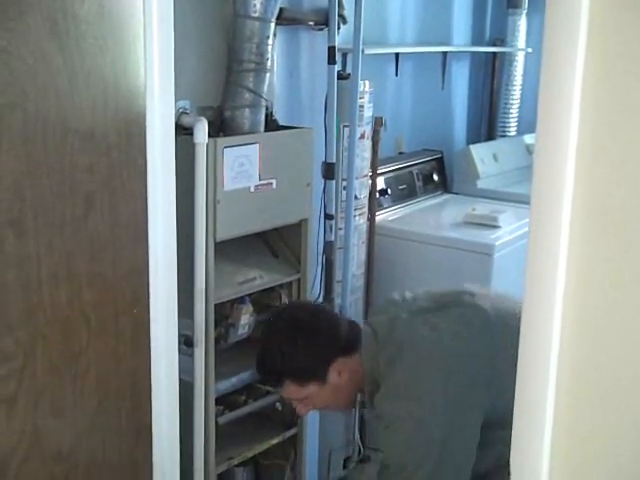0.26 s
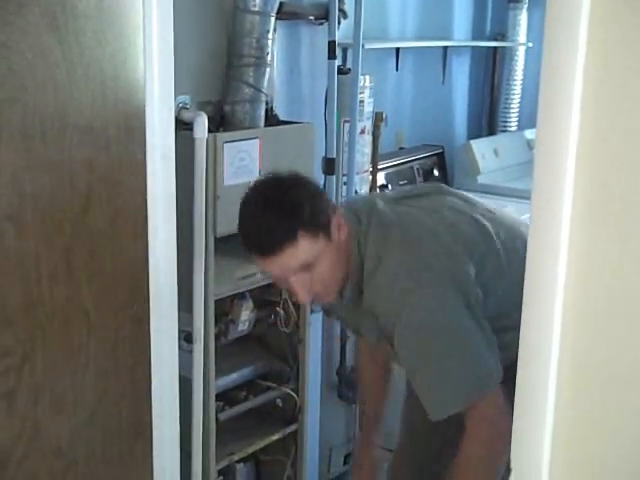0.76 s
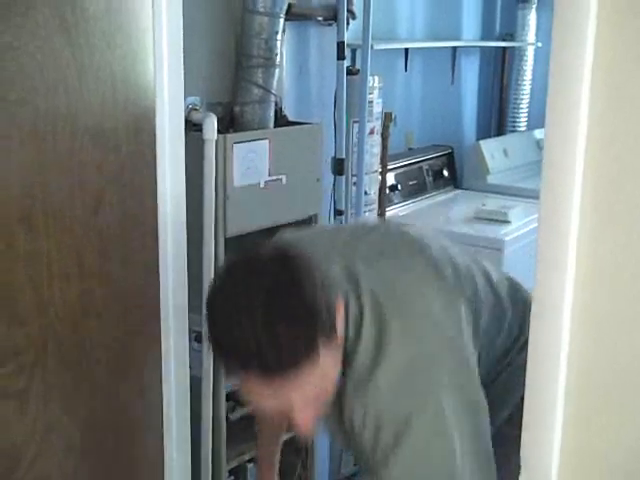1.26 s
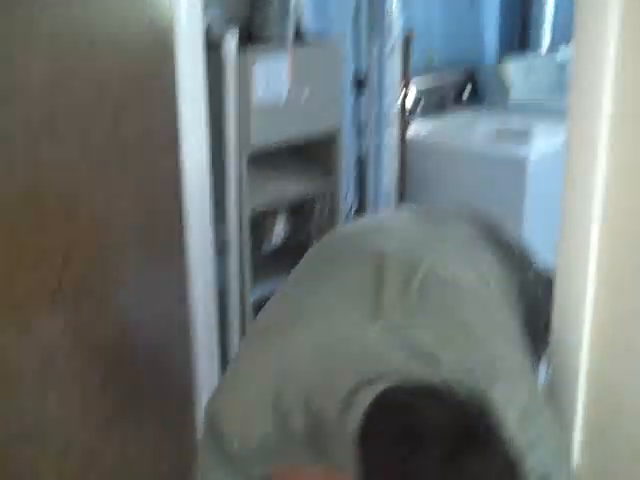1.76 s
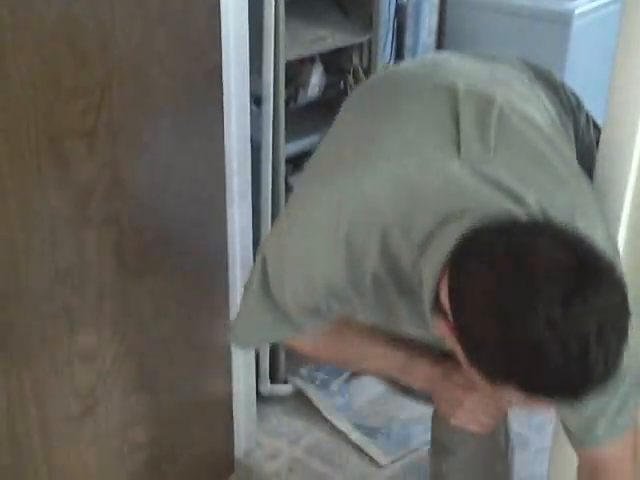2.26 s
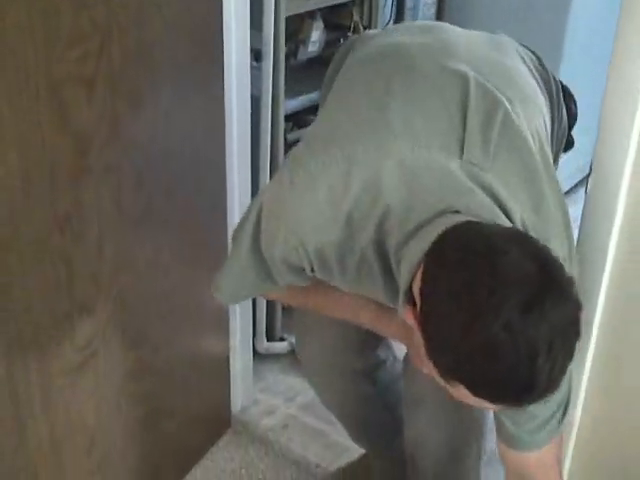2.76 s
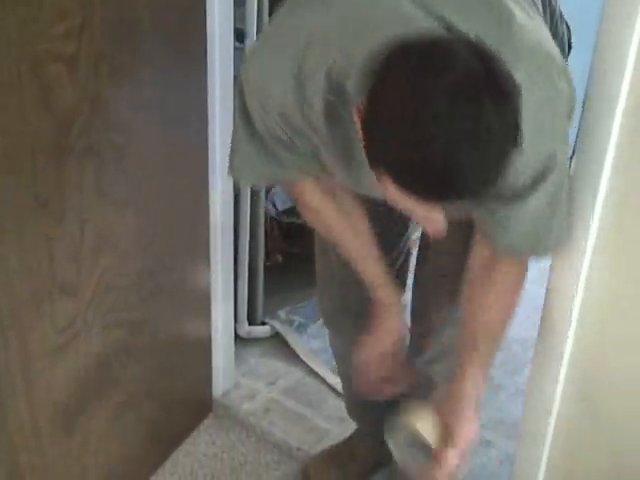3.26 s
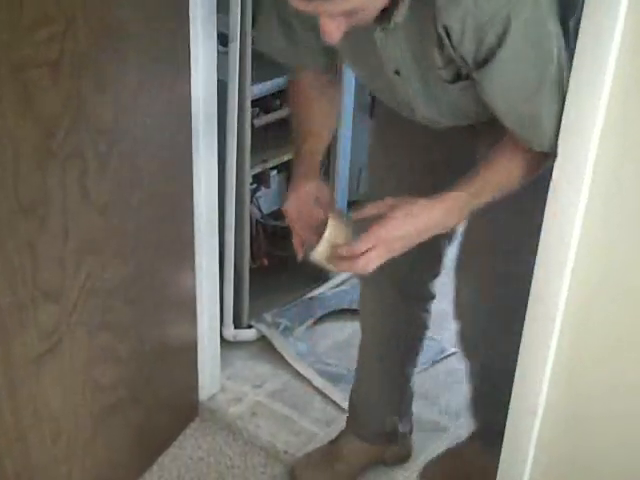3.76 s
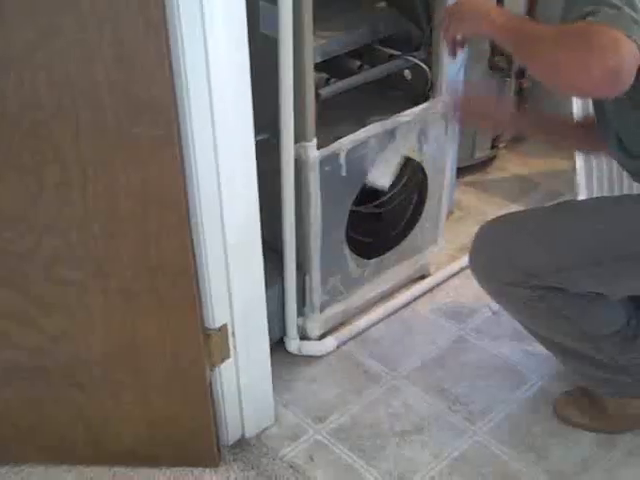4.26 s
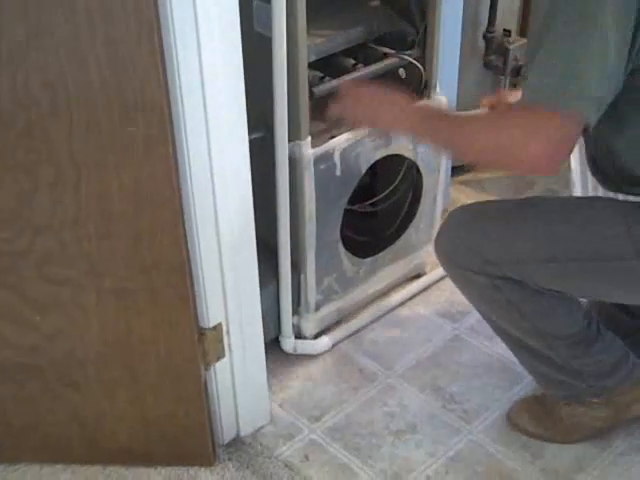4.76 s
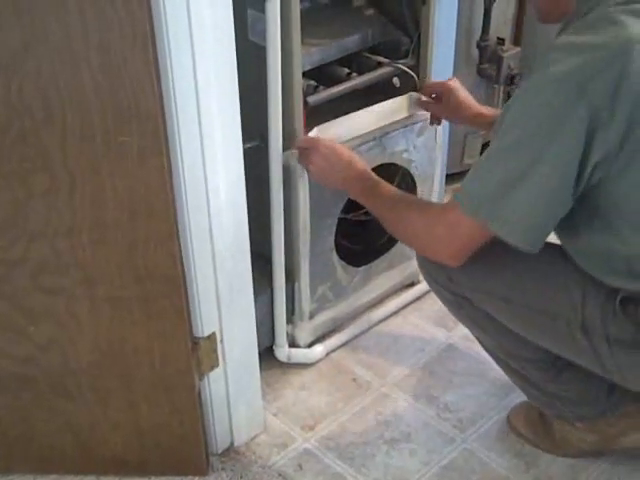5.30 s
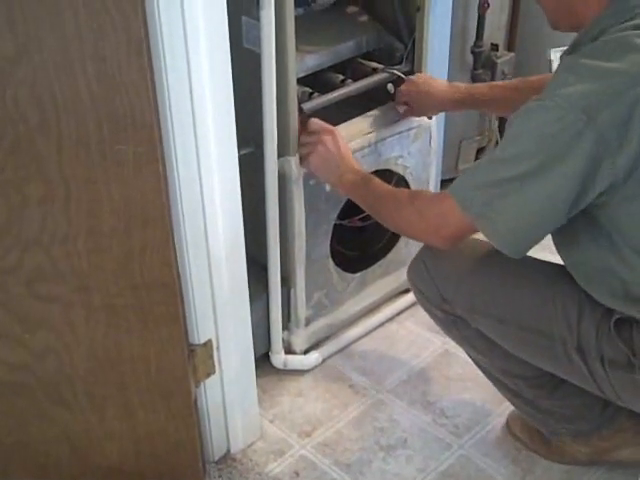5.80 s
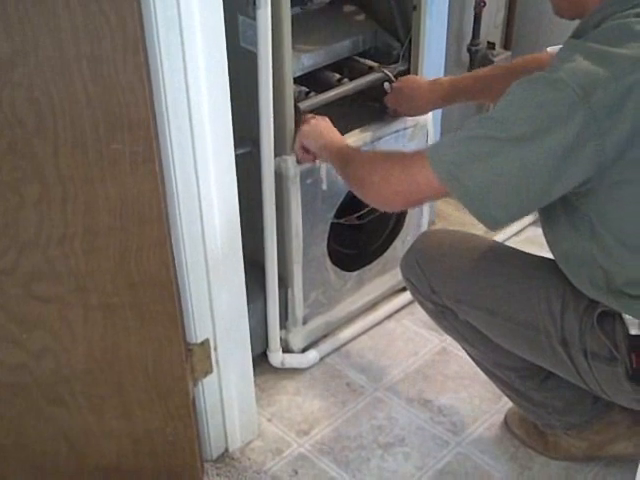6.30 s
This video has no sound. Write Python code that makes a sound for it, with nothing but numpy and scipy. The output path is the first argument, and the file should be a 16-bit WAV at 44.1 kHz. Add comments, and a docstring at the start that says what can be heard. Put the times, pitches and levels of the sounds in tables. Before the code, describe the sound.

A panel clatters down, then clothes rustle and tape peels and crinkles against plastic sheeting over a faint hiss in a small room.

```python
"""A small, hard-walled closet, where a man seals a furnace cabinet over a steady hiss of air. Shoes and hands
bump, a stiff panel clatters down and rings, and small hard things clack and clink. Clothes and plastic
sheeting rustle as he bends for the tape; a strip peels off in tiny slips of glue and is pressed on with
sharp crinkles. Jumps in the signal's offset make low pops, and the sound drops out once, briefly."""
import sys
import numpy as np
from scipy import signal
from scipy.fft import rfft, irfft
from scipy.io import wavfile

SR = 44100
rng = np.random.default_rng(int(sys.argv[2]) if len(sys.argv) > 2 else 0)


def wrap_up_sound(samples):
    """Save the sound to the file named by the first command line argument, as 16-bit audio."""
    columns = np.atleast_2d(samples).T
    # keep every value between -1 and 1, then stretch to whole-number steps
    tamed = np.clip(columns, -1, 1)
    steps = np.round(tamed * 32767).astype(np.int16)
    wavfile.write(sys.argv[1], SR, steps)


N = 288414
TIME = np.arange(N) / SR
CUTOFF_HZ = 15620
DIP_S, MUTE_S, RETURN_S = 4.326, 4.385, 4.4245   # the dropout


def from_db(db):
    """Decibels to gain."""
    return 10 ** (np.asarray(db) / 20)


def rms_one(x):
    """Scale to rms 1."""
    return x / np.sqrt(np.mean(x ** 2) + 1e-20)


def at_hz(points, hz):
    """Read a curve on a log-frequency axis."""
    f, value = np.transpose(points)
    return np.interp(np.log(hz + 1), np.log(f), value)


def add(out, s, sound):
    """Mix a sound in at s seconds."""
    i = max(0, round(s * SR))
    out[i:i + len(sound)] += sound[:N - i]


def colour(x, spectrum, tilt_db=0, peaks_hz=(), peak_db=7.0, peak_octaves=0.096, size=4096):
    """Minimum-phase EQ of unit energy: a spectrum, tilted per octave, with resonances on top."""
    hz = np.arange(size // 2 + 1) * SR / size
    shape_db = at_hz(spectrum, hz) + tilt_db * np.log2(np.clip(hz, 700, CUTOFF_HZ))
    shape_db += sum(peak_db / (1 + (np.log2((hz + 1) / f) / peak_octaves) ** 2) for f in peaks_hz)
    cepstrum = irfft(np.log(from_db(shape_db)))
    cepstrum[1:size // 2] *= 2   # folded forward, so nothing rings ahead of an attack
    cepstrum[size // 2 + 1:] = 0
    response = irfft(np.exp(rfft(cepstrum)))
    return signal.fftconvolve(x, response / np.linalg.norm(response))[:len(x)]


def air():
    """Room tone: a steady hiss, heaviest in the lows."""
    # noise colour: f/Hz, level/dB
    spectrum = [(15, -30.5), (25, 5), (140, -5), (227, -4), (523, -7), (722, -8), (895, -7.5), (1020, -8.5),
                (1530, -8.5), (1660, -12), (2300, -15), (3530, -16.5), (4260, -15.5), (5010, -22),
                (15500, -23.5)]
    return from_db(-67.5) * colour(rng.standard_normal(N), spectrum)


def contacts(hits, spectrum, crack, rise_s, size=8192):
    """Each hit is a crack in a fast-dying noise burst; returns these and compact blows for the reverb."""
    direct, blows, t = np.zeros(N), np.zeros(N), TIME[:size]
    click = signal.unit_impulse(size, round(SR / 1000))
    for s, db, tilt_db, fade_s, *own_hz in hits:
        envelope = np.exp(-t / fade_s) * (1 - np.exp(-t / rise_s))
        strength = from_db(db) * np.sqrt(np.mean(envelope ** 2))
        burst = rng.standard_normal(size) * envelope + crack * click
        add(direct, s, strength * rms_one(colour(burst, spectrum, tilt_db, own_hz)))
        blow = rms_one(colour(click, spectrum, tilt_db, own_hz))
        add(blows, s, strength * blow * rng.choice([-1, 1]))
    return direct, blows


def closet(x, wet_db, early_db, early_s, bands=12):
    """The walls return a cluster of near echoes and a diffuse tail that dies sooner in the treble."""
    # reverb decay: f/Hz, t60/s
    decay = [(150, 1), (500, 1), (1000, 0.53), (2000, 0.53), (4500, 0.43), (8000, 0.53), (15000, 0.1)]
    t, tail = TIME[:SR], 0
    edges = np.geomspace(60, 18000, bands + 1)
    for low, high in zip(edges, edges[1:]):
        bandpass = signal.butter(2, [low, high], "band", fs=SR, output="sos")
        band = signal.sosfilt(bandpass, rng.standard_normal(SR))
        tail = tail + band * from_db(-60 * t / at_hz(decay, np.sqrt(low * high)))
    early = rng.standard_normal(SR) * (rng.random(SR) < .05) * np.exp(-t / early_s)
    build_up = 1 - np.exp(-(t / 0.0019) ** 2)
    echoes = from_db(wet_db) * rms_one(tail * build_up) + from_db(early_db) * rms_one(early * build_up)
    return signal.fftconvolve(x, echoes / np.sqrt(SR))[:N]


def bumps():
    """Shoes and hands land dully on the vinyl floor and the cabinet."""
    # soft hits: t/s, level/dB, tilt/(dB/octave), fade/s
    hits = [(0.023, -52, -3, 0.0089), (0.037, -53.5, 4, 0.0093), (1.19, -61.5, -1, 0.035),
            (2.958, -46.5, 12, 0.0066), (3.9095, -39.5, 6, 0.0016), (6.211, -47.5, 6, 0.016)]
    # dull body of a bump: f/Hz, level/dB
    spectrum = [(80, -16.5), (200, -16), (400, -7), (650, 0), (950, -8.5), (1500, -17), (4000, -38.5),
                (15000, -68)]
    direct, blows = contacts(hits, spectrum, crack=0.96, rise_s=0.00071)
    return from_db(1.0) * (direct + closet(blows, wet_db=-2.0, early_db=-3.0, early_s=0.028))


def effort(gestures, rest_db, rest_brightness_db, roundness=0.54):
    """Level and brightness of sliding: each gesture swells to a rounded crest and sinks back to rest."""
    power = np.full(N, from_db(rest_db) ** 2)
    brightness = power * rest_brightness_db
    for s, db, brightness_db, swell_s, release_s in gestures:
        distance = np.maximum((s - TIME) / swell_s, (TIME - s) / release_s)
        fall = np.hypot(distance, roundness) - roundness
        share = (from_db(db) * np.exp(-np.minimum(fall, 20))) ** 2
        share *= (TIME > MUTE_S) == (s > MUTE_S)   # no gesture carries across the dropout
        power += share
        brightness += share * brightness_db
    return 10 * np.log10(power), brightness / power


def grains(per_s, spread_db):
    """Random tiny clicks of uneven size, rms about 1."""
    sizes_db = spread_db * np.minimum(rng.exponential(1, N), 4)
    clicks = rms_one(from_db(sizes_db) * rng.choice([-1, 1], N))
    chance = per_s / SR
    return clicks * (rng.random(N) < chance) / np.sqrt(chance)


def drift(per_s):
    """A gliding random wobble of spread about 1."""
    steps = rng.standard_normal(2000)
    return np.interp(TIME * per_s, np.arange(len(steps)), steps)


def friction(level_db, brightness_db, spectrum, per_s, spread_db, patchy_db, folds=9):
    """Many little slips ride a level curve; brightness see-saws between body and treble."""
    slips = colour(grains(per_s, spread_db), spectrum)
    # folds form and flatten, each with a resonance that comes and goes
    for hz in np.geomspace(1400, 9000, folds):
        fold = signal.lfilter(*signal.iirpeak(hz, Q=7, fs=SR), slips)
        slips = slips + fold * (from_db(patchy_db * drift(per_s=30)) - 1)
    body = signal.sosfilt(signal.butter(1, 3500, fs=SR, output="sos"), slips)
    treble = slips - body
    return from_db(level_db) * (body * from_db(-brightness_db) + treble * from_db(brightness_db))


def faint_creases(level_db, count, above_db=6, spread_db=5, tilt_db=7.5, hz=3420, spread_octaves=0.33):
    """Cues for small creases that give way at random, denser and louder the harder the plastic moves."""
    odds = np.cumsum(from_db(0.3 * level_db))
    moments = np.searchsorted(odds, odds[-1] * (np.arange(count) + rng.random(count)) / count)
    return [(i / SR, level_db[i] + above_db + spread_db * size, tilt_db, hz * 2 ** (spread_octaves * pitch))
            for i, (size, pitch) in zip(moments, rng.standard_normal((count, 2)))]


def creases(cues, fade_s=0.0031):
    """Each crease snaps through with a short crack at its own resonance."""
    # colour of a snap: f/Hz, level/dB
    spectrum = [(100, -26.5), (300, -13.5), (700, -9.5), (1100, -4.5), (2000, -0.5), (3300, 1), (5000, -1),
                (7000, -3), (11000, -8.5), (15500, -14)]
    hits = [(s, db, tilt_db, fade_s, hz) for s, db, tilt_db, hz in cues]
    return np.array(contacts(hits, spectrum, crack=0.5, rise_s=0.0015))


def rustle():
    """Clothes and sheeting slide, never quite still, with a few small creases and clinks among them."""
    # body movements: crest t/s, level/dB, brightness/dB, swell/s, release/s
    moves = [(0.15, -67.5, -4.5, 0.4, 0.3), (0.285, -57.5, -2.5, 0.007, 0.046),
             (0.72, -56.5, -2.5, 0.13, 0.13), (1.23, -68, -4.5, 0.13, 0.12),
             (1.645, -45.5, 1, 0.021, 0.028), (1.75, -58.5, -0.5, 0.037, 0.12),
             (1.885, -51.5, 0.5, 0.016, 0.12), (2.095, -43.5, 0.5, 0.024, 0.075),
             (2.34, -57, -1.5, 0.02, 0.11), (2.67, -51.5, 0, 0.038, 0.02), (2.79, -52.5, -1.5, 0.052, 0.16),
             (3.005, -46, 2, 0.042, 0.04), (3.2, -50, 2.5, 0.045, 0.02), (3.33, -64.5, 0.5, 0.027, 0.055),
             (3.705, -60.5, -1.5, 0.045, 0.05), (3.8, -62.5, 1, 0.01, 0.015),
             (4.085, -60.5, 1, 0.016, 0.08), (4.26, -52.5, 0.5, 0.01, 0.3)]
    # colour of sliding cloth: f/Hz, level/dB
    spectrum = [(100, -8.5), (300, -10), (700, -2), (1400, 0.5), (3000, 1.5), (5000, -1.5), (8000, -3),
                (12000, -4), (15500, -7)]
    level_db, brightness_db = effort(moves, rest_db=-73.5, rest_brightness_db=0.5)
    slide = friction(level_db, brightness_db, spectrum, per_s=5000, spread_db=2.0, patchy_db=2.5)
    snaps, _ = creases(faint_creases(level_db, count=24))
    sound = from_db(-0.7) * slide + from_db(2.5) * snaps + clinks()
    return sound + closet(sound, wet_db=-15.5, early_db=-15.0, early_s=0.023)


def ringing(hits, modes, spread_db=4.9):
    """Every hit sets the same modes ringing in a new balance."""
    out, t = np.zeros(N), TIME[:SR]
    hz, mode_db, t60 = np.transpose(modes)
    rings = np.sin(2 * np.pi * hz[:, None] * t) * from_db(-60 * t / t60[:, None])
    for s, db, *_ in hits:
        strengths = from_db(db + mode_db + rng.normal(0, spread_db, len(hz)))
        add(out, s, (strengths * rng.choice([-1, 1], len(hz))) @ rings)
    return out


def clacks():
    """Small hard things are picked up and set down: light attacks with a faint ring."""
    # hard hits: t/s, level/dB, tilt/(dB/octave), fade/s
    hits = [(0.2665, -48.5, -13, 0.0056), (2.420, -40, -8, 0.0048), (2.4339, -21.5, 0, 0.0029),
            (2.445, -32.5, 2.5, .005), (2.452, -33, -4, 0.0033), (2.466, -38, 2.5, 0.01),
            (2.49, -40.5, 0.5, 0.017), (3.215, -40, -7.5, 0.0023), (3.909, -42, -1.5, 0.0026),
            (4.543, -48.5, -11, 0.0041), (6.234, -45, -10, 0.006)]
    # colour of the attack: f/Hz, level/dB
    spectrum = [(50, -47), (100, -31), (300, -15), (700, -9), (1100, -0.5), (1450, 4.5), (2200, -4.5),
                (3400, -2.5), (4300, -5.5), (5000, -4.5), (6200, -14.5), (10000, -21), (15500, -26)]
    # ring of the objects: f/Hz, level/dB, t60/s
    modes = [(913, -6.5, 0.41), (1225, 2, 0.19), (1450, -8, 0.27), (1570, 4, 0.26), (3600, -16, 0.18),
             (4900, -8, 0.26), (5080, -35, 0.29)]
    direct, blows = contacts(hits, spectrum, crack=4.9, rise_s=0.00059)
    direct += from_db(-27.5) * ringing(hits, modes)
    return from_db(-3.5) * (direct + closet(blows, wet_db=-2.0, early_db=-5.5, early_s=0.014))


def tape():
    """The glue lets go in countless small slips; creases snap as tape and sheeting are handled."""
    # pulls and rubs: crest t/s, level/dB, brightness/dB, swell/s, release/s
    pulls = [(4.75, -41, 3, 0.048, 0.06), (4.9, -52.5, 0, 0.022, 0.057), (5.045, -57, 3, 0.031, 0.025),
             (5.19, -53.5, 4, 0.022, 0.026), (5.515, -62, -1, 0.01, 0.05), (5.62, -61.5, 5, 0.02, 0.025),
             (5.71, -51.5, 2, 0.02, 0.019), (5.88, -62.5, -2, 0.05, 0.16), (6.1, -50.5, -4, 0.011, 0.08),
             (6.35, -56, -6, 0.015, 0.13), (6.535, -53, 0, 0.025, 0.037)]
    # colour of the peel: f/Hz, level/dB
    spectrum = [(180, -59), (300, -38), (417, -16), (526, -7), (590, -12.5), (685, -7.5), (1200, -4.5),
                (2000, -4), (2830, -4), (5000, -4.5), (9000, -11), (12300, -12.5), (15500, -16)]
    # foreground creases: t/s, level/dB, tilt/(dB/octave), resonance f/Hz
    crinkles = [(0.2671, -40, -5, 1200), (1.5746, -44, -5, 2310), (1.6011, -35.5, -3, 6300),
                (1.6241, -40, -3, 2880), (1.6892, -37.5, -1, 2440), (1.8724, -37.5, 0.5, 3340),
                (1.9484, -36, -0.5, 4070), (2.124, -32.5, -4.5, 2320), (2.1482, -28, 4, 6100),
                (2.1836, -20.5, 0.5, 3040), (2.206, -30.5, -1.5, 4520), (4.2383, -33.5, -2.5, 4060),
                (4.5887, -40, 3, 3310), (4.6054, -45, -7.5, 3480), (4.6613, -29, -3, 2050),
                (4.7484, -29.5, -0.5, 2966), (4.884, -28, 1.5, 4840), (5.0468, -37.5, 8, 5130),
                (5.147, -44.5, 6, 10900), (5.1777, -31, 2, 5200), (5.3592, -49, 8, 3450),
                (5.4953, -43, 0, 3300), (5.7342, -31, -1.5, 3320), (5.7853, -39, -2, 3190),
                (5.7992, -35.5, -1, 2590), (5.8506, -35.5, -1, 5670), (5.895, -41, 7, 3800),
                (6.0584, -33.5, 0, 3240), (6.0674, -30.5, -1.5, 5100), (6.0902, -25, -2, 2820),
                (6.1044, -28, -2.5, 3700), (6.2039, -37, -5, 3290), (6.213, -28.5, -1, 1900),
                (6.232, -28, -1, 2790), (6.3306, -28.5, 3.5, 4700), (6.3377, -31.5, -3.5, 4200),
                (6.3819, -26.5, 2, 3310), (6.5184, -36, 3, 2870)]
    level_db, brightness_db = effort(pulls, rest_db=-79.5, rest_brightness_db=-8.5)
    peel = friction(level_db, brightness_db, spectrum, per_s=3500, spread_db=2.5, patchy_db=4.5)
    peel *= from_db(-2.0)
    snaps, blows = from_db(-1.0) * creases(crinkles + faint_creases(level_db, count=36))
    send = from_db(-6.5) * peel + blows
    return peel + snaps + closet(send, wet_db=-8.0, early_db=-4.5, early_s=0.018)


def panel():
    """A stiff panel lands on one edge, then slaps down, bounces and rings."""
    # knocks on floor and cabinet: t/s, level/dB, tilt/(dB/octave), fade/s
    hits = [(0.7048, -25.5, 5, 0.0048), (0.710, -28, -12, 0.0038), (0.717, -36, -3, 0.0037),
            (0.7265, -28, -2.5, 0.0065), (0.731, -21, 0, 0.0085), (0.7385, -25.5, 5, 0.005),
            (0.746, -40, -0.5, 0.014), (0.753, -29.5, 0.5, 0.0055), (0.761, -24.5, -1, 0.01),
            (0.768, -23, -6, 0.0046), (0.927, -38, 2, 0.0066)]
    # colour of the slap: f/Hz, level/dB
    spectrum = [(50, -71), (100, -52.5), (135, -26.5), (200, -21), (330, -14.5), (500, -12), (750, -7.5),
                (1050, 3), (1600, -1), (2200, -5.5), (3000, -11), (4000, -20.5), (4900, -20.5), (6000, -29),
                (10000, -36.5), (15500, -48)]
    # ring of the panel: f/Hz, level/dB, t60/s
    modes = [(328, -22, .5), (510, -24.5, 1), (863, -15, 0.45), (1057, -1.5, 0.4), (1140, -34, .3),
             (1274, -1, 0.22), (1240, -9, 0.32), (1494, -5, 0.22), (1637, 4, 0.14), (1544, -16, 0.14),
             (1860, 0, 0.29), (1820, -23, 0.32), (2140, -21, 0.26)]
    direct, blows = contacts(hits, spectrum, crack=2.2, rise_s=0.00052)
    direct += from_db(-21.0) * ringing(hits, modes)
    return from_db(-0.5) * (direct + closet(blows, wet_db=-6.0, early_db=-4.0, early_s=0.032))


def clinks():
    """Small metal things touch and ring in high, pure modes."""
    # pings: t/s, level/dB, f/Hz, t60/s
    pings = [(1.6, -50, 6370, 0.065), (1.6, -46.5, 12100, 0.11), (2.031, -41.5, 6358, 0.083),
             (2.03, -46, 4330, 0.046), (2.03, -44, 13500, 0.04), (2.152, -43, 14400, .16),
             (2.152, -36, 14520, .09), (2.151, -47, 10750, 0.1), (2.151, -48, 6020, .14),
             (2.186, -48, 5470, 0.25), (2.325, -53, 5670, 0.11), (2.343, -58, 14300, .08)]
    out, t = np.zeros(N), TIME[:SR // 2]
    for s, db, hz, t60 in pings:
        add(out, s, from_db(db - 60 * t / t60) * np.sin(2 * np.pi * hz * t))
    return out


def offset_pops(flutter_s=2.529, gap_s=0.034, flutter_height=-0.0027):
    """The signal's offset jumps and leaks away as a low pop; a run of small jumps flutters softly."""
    # offset jumps: t/s, signed height, rise/s, settling/s
    jumps = [(2.1503, 0.026, 0.00022, 0.098), (2.1506, 0.084, 0.00022, 0.00067),
             (4.4255, -0.037, 0.00011, 0.13)]
    flutter = [(flutter_s + k * gap_s, flutter_height, .0002, .11) for k in range(8)]
    out, t = np.zeros(N), TIME[:SR]
    for s, height, rise_s, settle_s in jumps + flutter:
        add(out, s, height * (np.exp(-t / settle_s) - np.exp(-t / rise_s)))
    return out


def scene():
    """All the handling over the closet's steady hiss, in mono."""
    return (air() + panel() + clacks() + bumps() + rustle() + tape())[None]


def record(dry, steady_offset=-0.00049):
    """The level drops out in two steps and returns, the offset pops, a steep low-pass trims the top."""
    gain_db = (-27 * (TIME > DIP_S) - 25 * (TIME > MUTE_S)) * (TIME < RETURN_S)
    sound = dry * from_db(gain_db) + offset_pops() + steady_offset
    return signal.sosfilt(signal.ellip(12, .1, 80, CUTOFF_HZ, fs=SR, output="sos"), sound)


dry = scene()
out = record(dry)
wrap_up_sound(out)
```